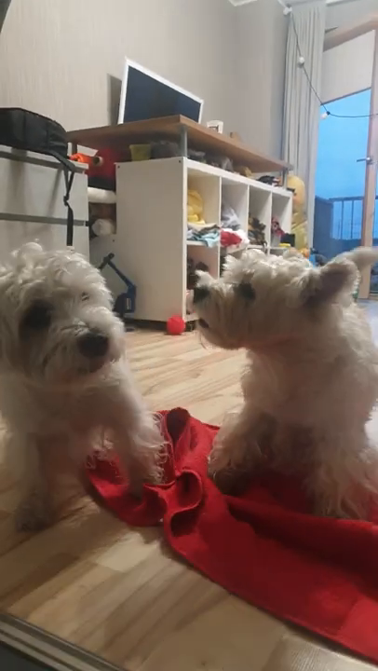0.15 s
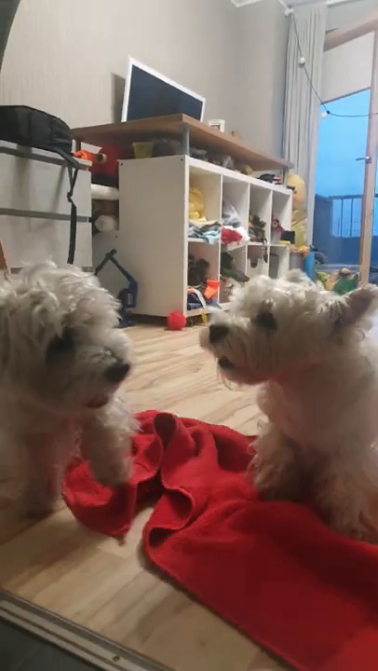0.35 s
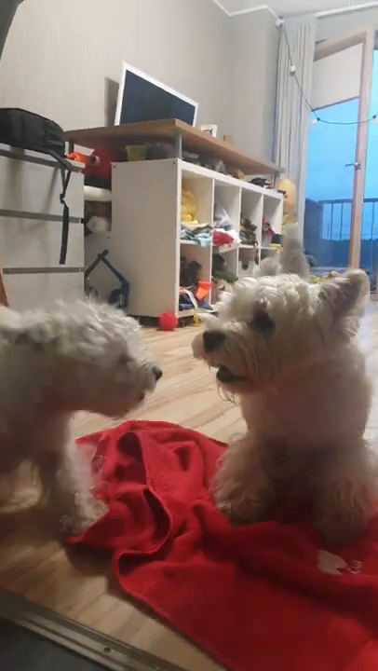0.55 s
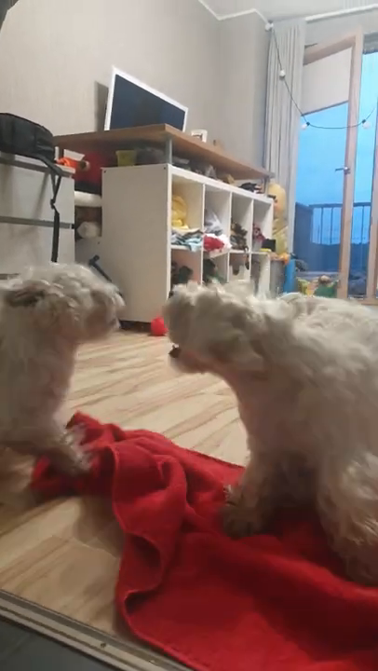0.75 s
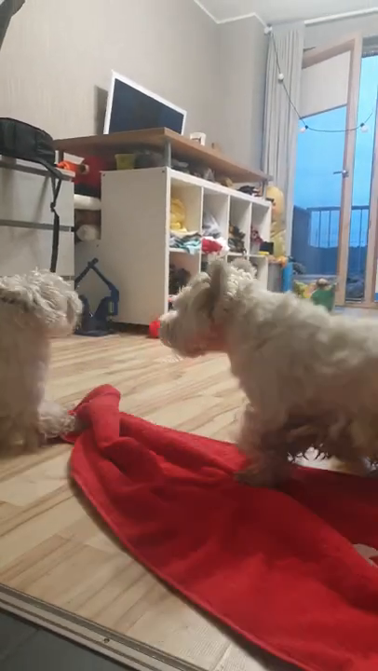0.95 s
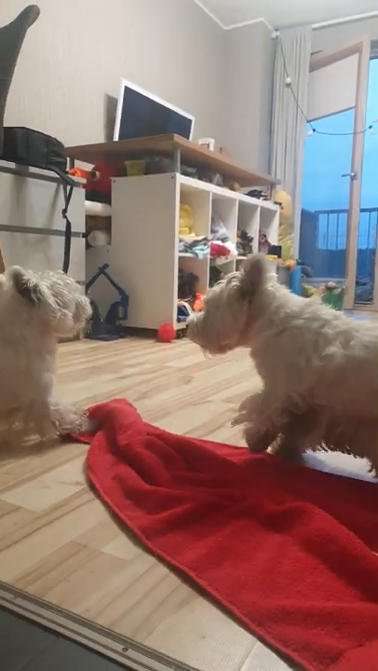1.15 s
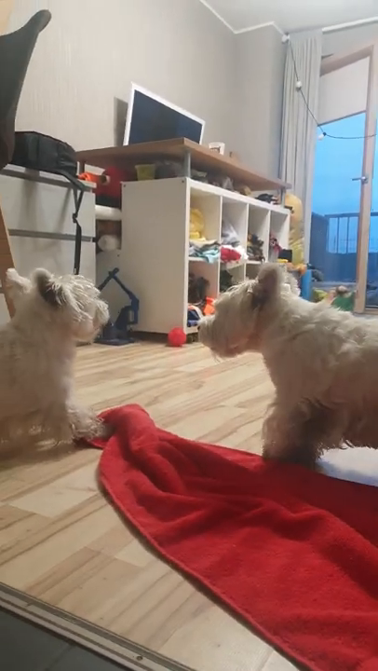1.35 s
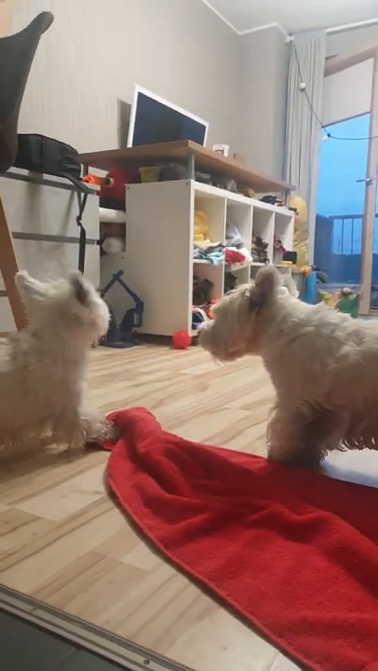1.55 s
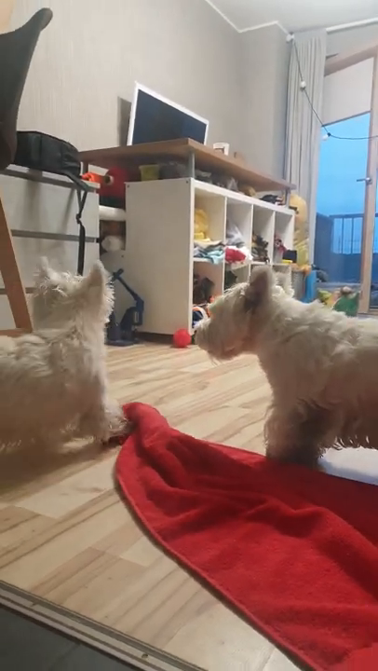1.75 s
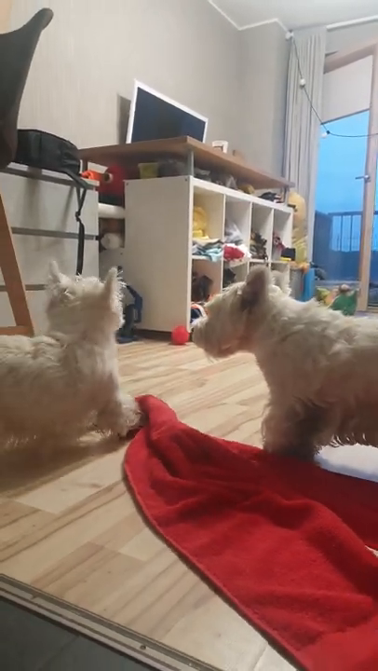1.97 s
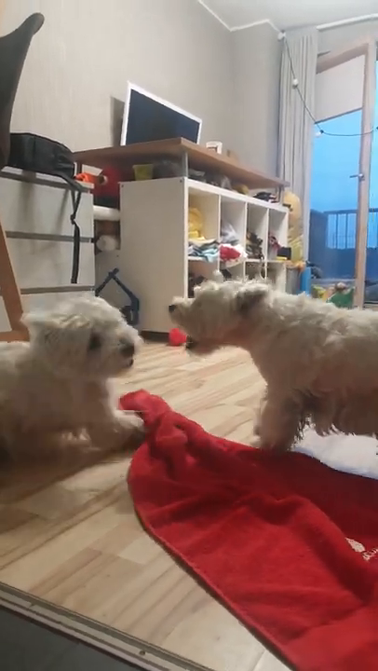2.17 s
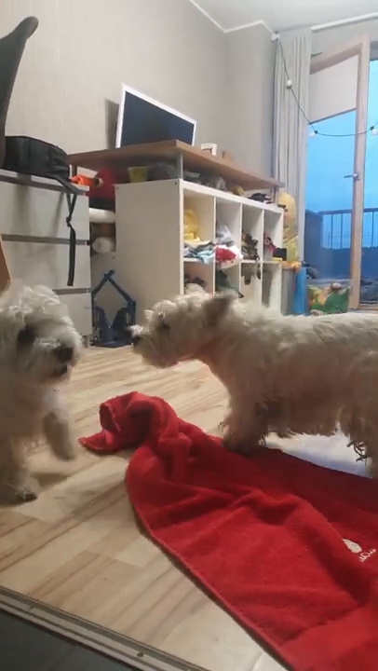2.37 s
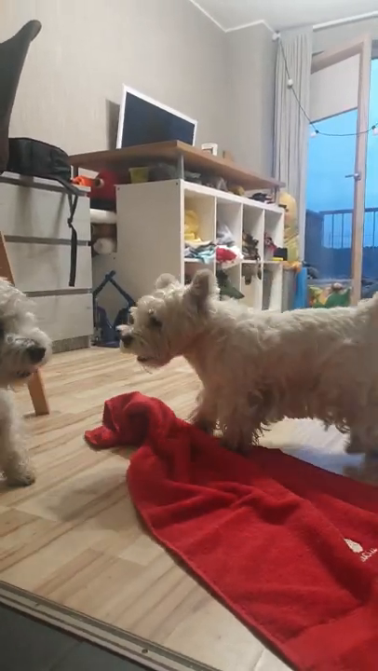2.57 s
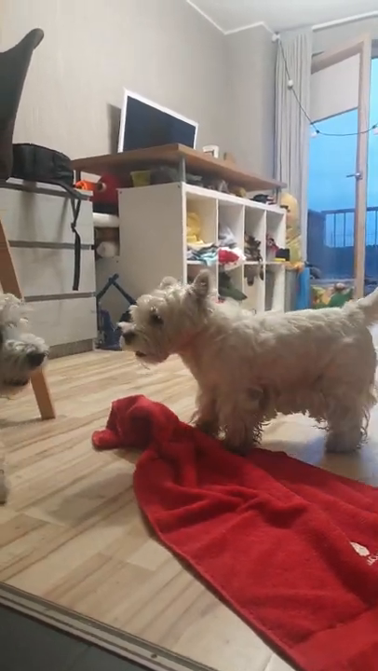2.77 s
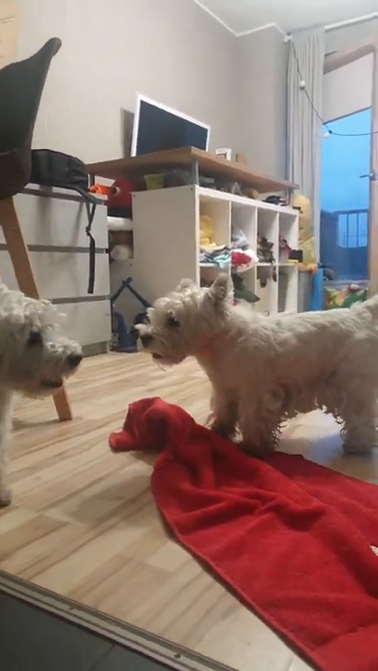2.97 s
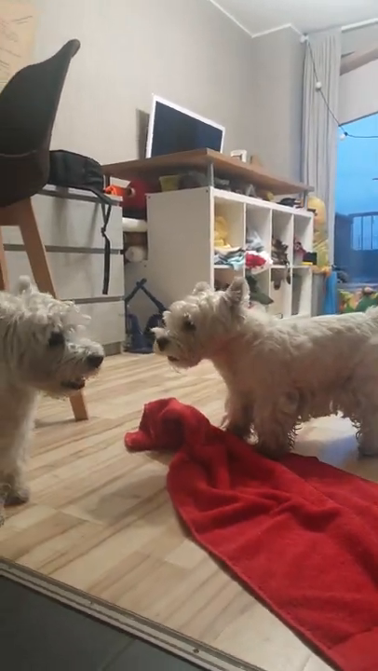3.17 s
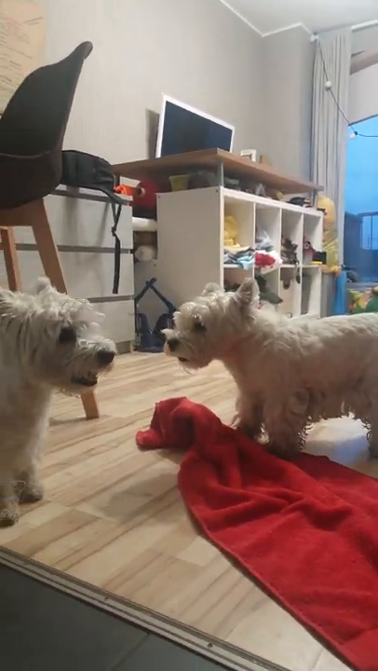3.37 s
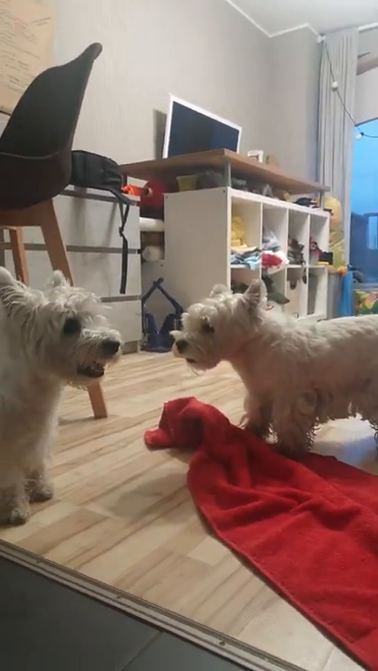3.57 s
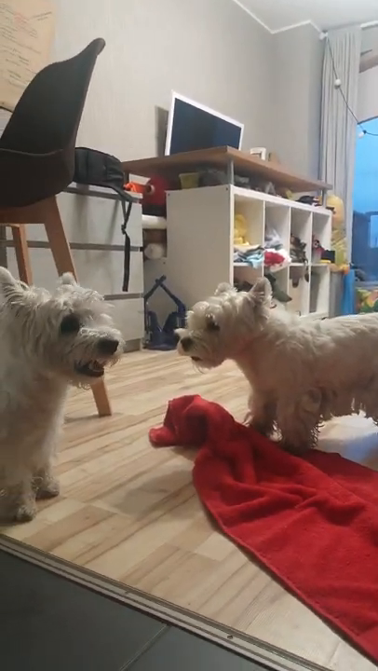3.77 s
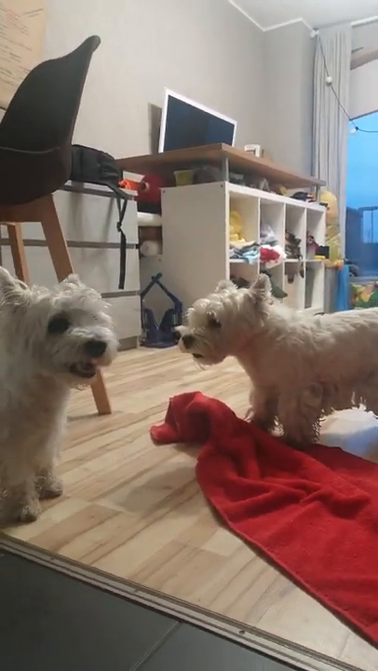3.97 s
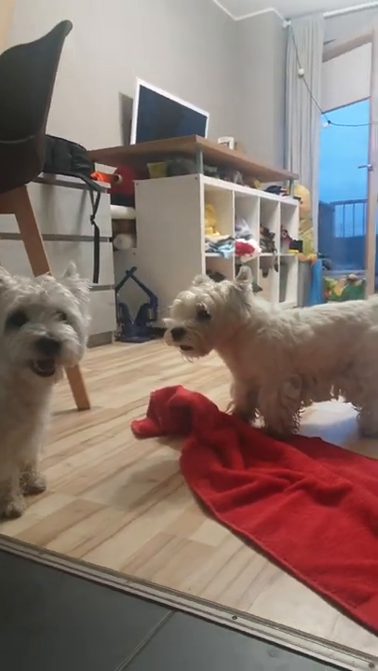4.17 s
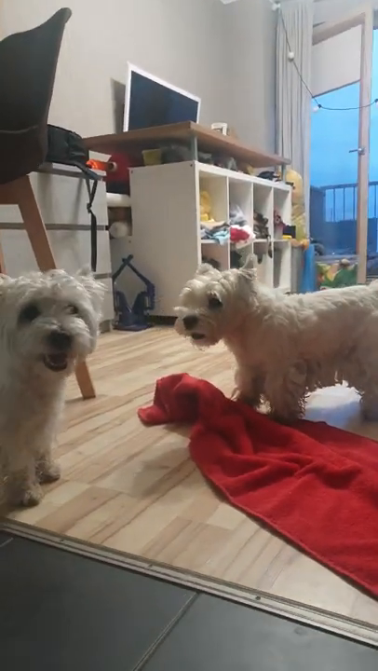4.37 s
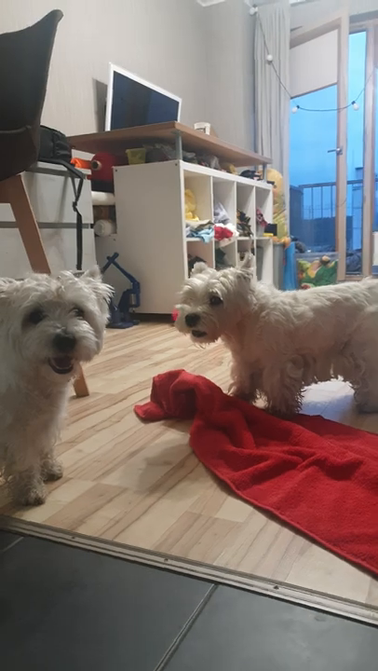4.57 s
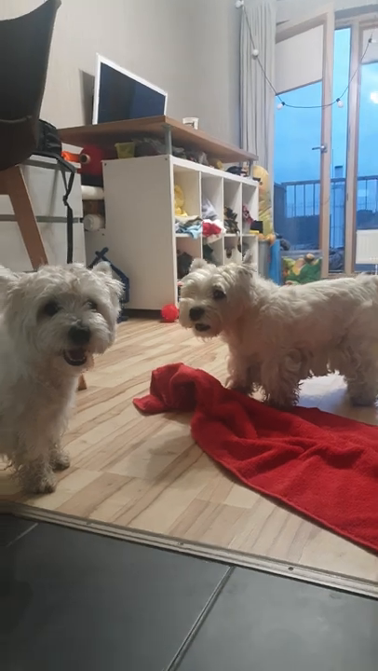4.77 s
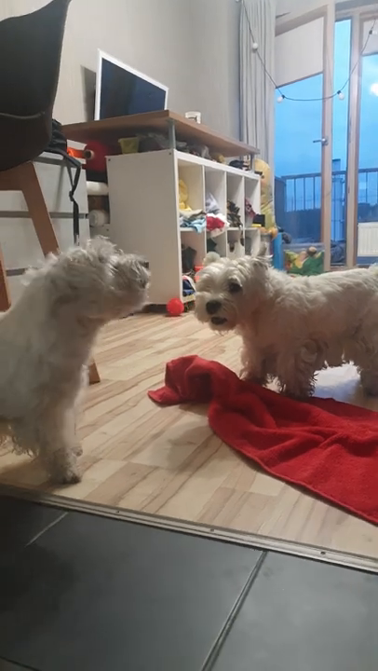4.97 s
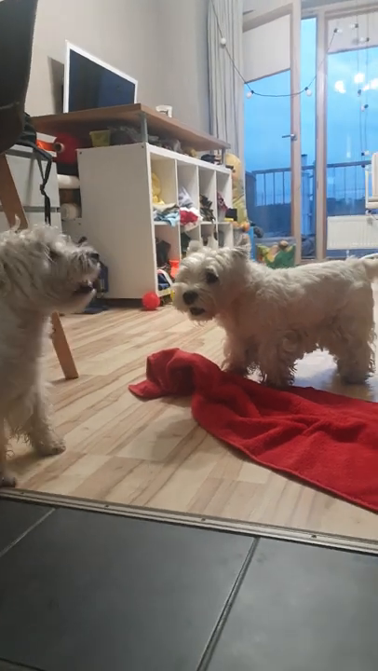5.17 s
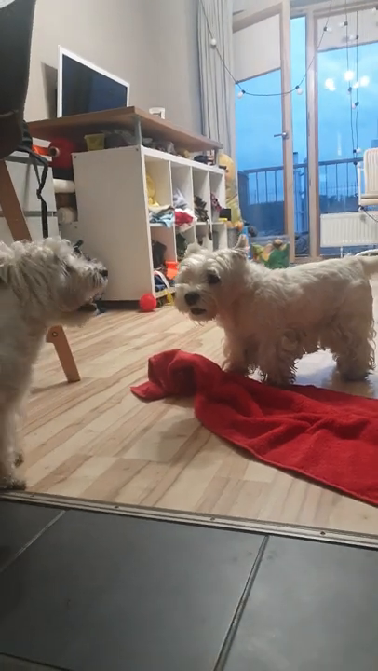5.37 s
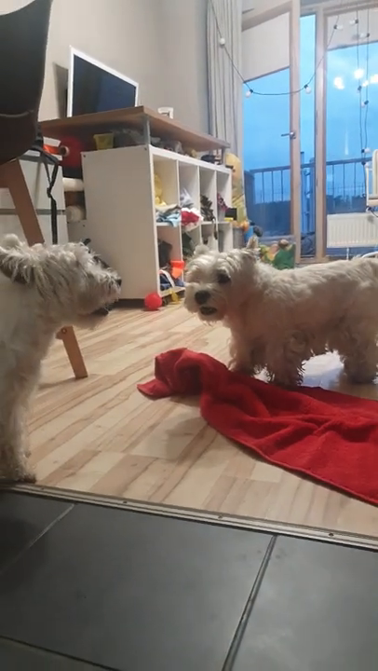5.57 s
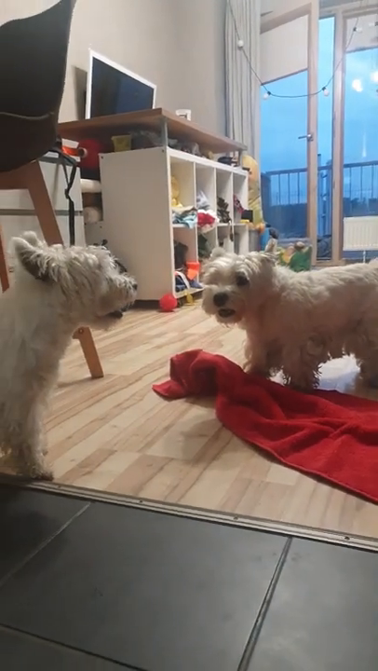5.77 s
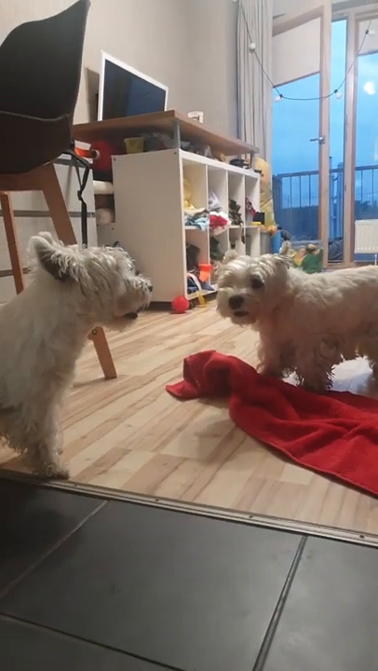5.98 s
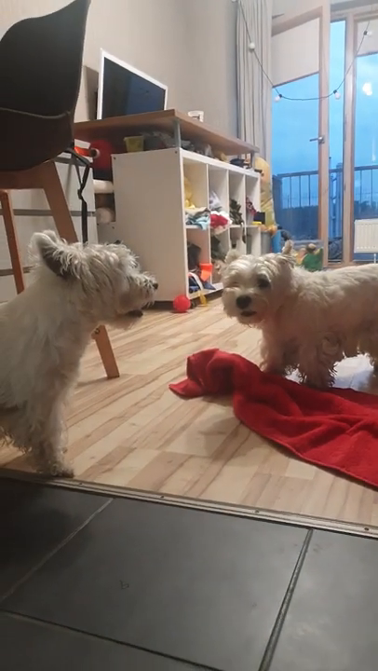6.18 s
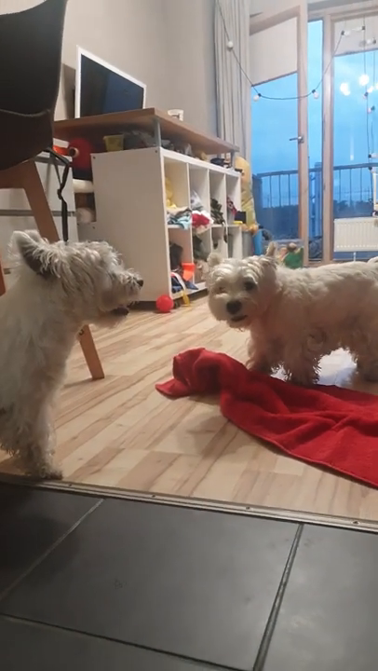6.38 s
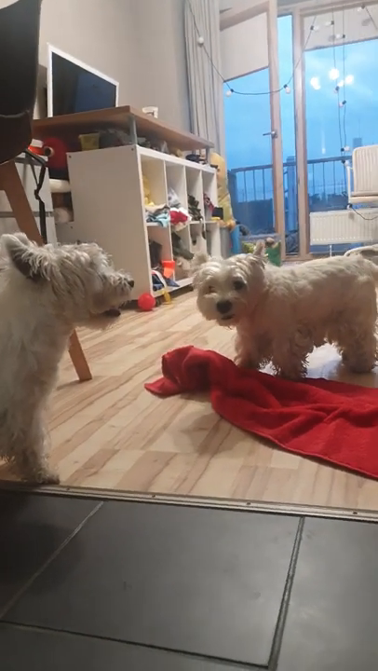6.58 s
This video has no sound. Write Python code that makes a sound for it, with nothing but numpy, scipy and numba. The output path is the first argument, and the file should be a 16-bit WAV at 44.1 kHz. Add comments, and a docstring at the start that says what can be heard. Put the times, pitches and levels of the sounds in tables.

```python
"""Two loud, hoarse barks ring through a living room, among low grumbles, claw taps, thumps and sharp snorts.
Two small terriers face each other on a wooden floor, about a metre from a two-port microphone.
Barks, grumbles and a low chest tone are vocal fold pulses and turbulence, coloured by resonance or spectrum;
snorts are shaped noise, claws are ticks and skidding noise, thumps are dying sines.
Sparse room noise lies below: rumble, hum, air and hiss; its low part swells towards the end."""
import sys
import numpy as np
from scipy import signal
from scipy.fft import rfft, irfft, next_fast_len
from scipy.io import wavfile
from scipy.ndimage import uniform_filter1d, minimum_filter1d
from numba import njit

SR = 44100
rng = np.random.default_rng(int(sys.argv[2]) if len(sys.argv) > 2 else 0)


def unload_audio(sound):
    """Save the sound as a 16-bit wav file, at the path given as the first command line argument."""
    columns = np.transpose(np.atleast_2d(sound))
    # keep every value between -1 and 1, then stretch to whole-number steps
    steps = np.round(np.clip(columns, -1, 1) * 32767)
    wavfile.write(sys.argv[1], SR, steps.astype(np.int16))


N = 292277
TIME = np.arange(N) / SR

# Barks, one push of effort each: (full effort at [s], attack [s], hold [s], release [s], level [dB],
# top pitch [Hz], pitch breaks after [s], lower note [Hz], roughness [0-1],
# clear overtone on the top note [dB], on the lower note [dB])
BARK_EFFORTS = [(.823, .03, .026, .045, -13, 763.7, .047, 582.8, 0.34, -5, -2.5),
                (2.251, 0.028, .039, 0.028, -11.8, 656.4, .034, 534, 0.67, -18, 1)]
# Throat and mouth resonances with the jaws wide open: (centre [Hz], width [Hz], level [dB])
FIRST_THROAT = [(735, 220, -16), (1208, 130, 3), (1520, 470, -1.5), (2200, 270, 1.5), (2620, 119, 2),
                (3070, 320, -7), (4040, 290, -14)]
SECOND_THROAT = [(805, 210, -8), (1090, 216, 6), (1206, 396, 3.5), (1594, 100, 0.5), (1908, 161, 1),
                 (2600, 730, -4.5), (2794, 160, 1), (3610, 150, -5.5)]
ATTACK_CURVE = 1.6   # exponent; below 2 the effort creeps in before it surges
REST_PITCH_HZ, PITCH_LAW = 195.15, .85   # pitch climbs from rest as a power of the effort
BREAK_S, SAG_HZ_PER_S = 0.0079, 350   # the drop to the lower note takes this long; then that note sags
JAW_AT_REST, JAW_LAW = 0.29, 1   # mouth opening 0-1 without effort; it grows as a power of the effort
LOW_NOTE_ROUGHNESS = .52   # 0-1

# Low grumbles, and the low chest tone as the first bark dies away:
# (start [s], pitch halfway [Hz], level before the fade [dB])
LOW_VOICES = [(0, 191.7, -39), (.325, 168, -55.5), (0.751, 240.4, -41), (.889, 205, -43),
              (1.056, 167.2, -44.5), (1.115, 142, -46), (2.114, 185.2, -47.5), (2.632, 176.7, -52),
              (2.68, 215.8, -52), (4.895, 212.3, -45)]
# Spectrum of these low voices: (frequency [Hz], level [dB])
LOW_VOICE_COLOUR = [(100, -3.5), (200, 3.5), (340, -2), (600, -15), (1100, -6.5), (1800, -18), (4000, -20),
                    (9000, -33.5)]
LOW_VOICE_S = 0.043

# Puffs of air through the muzzle: (peak [s], length [s], level [dB], nasal share of power [0-1],
# throat rasp relative to the puff [dB], mouth resonance [Hz])
SNORT_PUFFS = [(.005, 0.031, -45, 0.06, 1.5, 1180), (0.392, 0.098, -53, .2, -9.5, 2044),
               (0.521, 0.043, -54.5, 0.92, -24, 2230), (2.73, .105, -58, 0.55, -12.5, 1700),
               (4.899, .06, -53, 0.09, -16, 2245), (5.018, 0.062, -41.5, 1, -25.5, 2100),
               (5.146, 0.12, -43, 0.28, -9, 2100), (5.455, 0.055, -42.5, 1, -17.5, 2100),
               (5.536, .075, -42, 0, -29, 2350), (6.332, .05, -35.5, .15, -2, 2640)]
# Air in the mouth: (multiple of the mouth resonance [ratio], level [dB])
MOUTH_AIR = [(0.049, -24), (.2, -17.5), (0.429, -21), (.66, -6), (.88, 6), (1.15, -3), (1.451, -5.5),
             (2, -13.5), (3.299, -28.5), (7, -40.5)]
# Air in the nostrils, also used for hiss past the teeth: (frequency [Hz], level [dB])
NOSE_AIR = [(100, -12.5), (450, -3.5), (1200, -10.5), (2000, -9.5), (3200, -2), (5000, 3), (6800, -2.5),
            (8500, -12.5), (12000, -7), (16000, -14.5)]
# Air rasping in the throat: (frequency [Hz], level [dB])
THROAT_RASP = [(100, -15.5), (220, 0.5), (450, 4), (680, 4), (880, -5.5), (1150, 3), (1500, -10),
               (2100, -10.5), (2800, -7), (3700, -19.5), (9000, -36.5)]
SNORT_RISE_SHARE = .35   # of its length

# Claws on the boards: (time [s], level before gain and colour [dB],
# top octave against the mids [dB], starting skid level before gain and colour [dB])
CLAW_TAPS = [(0.1193, -38, 1, -2), (.363, -43, -27, 0), (0.5778, -43, 7, 0), (0.5879, -28, 2, -2.5),
             (.7172, -36, -17, -8), (1.0251, -36.5, -19.5, -35), (2.0987, -29.5, -10.5, -13),
             (2.3288, -37.5, 6, -0.5), (2.409, -36.5, 0, -10), (2.4778, -35.5, -21, -3),
             (2.524, -41.5, -6, -7), (2.8993, -42.5, -18.5, -7), (3.5024, -62.5, 6, -5.5),
             (4.882, -57, -19, -1), (4.916, -41.5, -23, -18), (5.0007, -34, -7, 5.5), (5.007, -30, -10, -7),
             (5.1535, -36, 9.5, -9), (5.4314, -37.5, -4, -3.5), (6.314, -36.5, -8, -12)]
# Spectrum of claw on wood: (frequency [Hz], level [dB])
CLAW_ON_WOOD = [(150, -17.5), (350, -7), (650, -4), (1000, -10), (2000, -7.5), (3500, -4), (5000, 2.5),
                (6800, -2), (8500, -12.5), (11500, -3.5), (16000, -12.5)]
TICKS_IN_ROOM_DB = 4   # the boards throw the ticks up into the room

# Soft thumps of paws and jaws: (time [s], level before the band filter [dB], pitch [Hz])
PADDED_BLOWS = [(.577, -29.5, 337), (.592, -30, 534), (.692, -37.5, 232), (2.099, -32.5, 296),
                (2.331, -26, 270), (2.412, -34, 333), (2.487, -37.5, 335), (5.001, -35.5, 640),
                (5.007, -31.5, 292), (5.169, -22.5, 204), (6.354, -16.5, 258)]
THUMP_T60_S = 0.03066

# Spectrum of the room noise: (frequency [Hz], level [dB])
ROOM_TONE = [(18, -42), (35, -25.5), (64, -0.5), (115, -3.5), (161, -3), (210, -18.5), (280, -10),
             (404, -26.5), (988, -21.5), (1280, -25.5), (2350, -33.5), (5590, -37.5), (7090, -42.5),
             (8600, -55.5), (16000, -54)]
# Hum of a household appliance: (mean frequency [Hz], level on the rumble's scale [dB])
APPLIANCE_HUM = [(68, -4.5), (106, -9), (147, -12.5), (212, -12.5), (282, -13)]
# Treble hiss: (time [s], level [dB])
HISS_LEVEL = [(0, -65.5), (1.4, -100), (3.42, -93), (3.55, -75.5), (4.25, -80.5), (5.7, -69.5)]
RUMBLE_DB, MIDDLE_DB = -62, -68   # base levels before the swell and the lift
SWELL_AT_S, SWELL_S = 4.98, 0.24   # middle and time constant of the one smooth swell
RUMBLE_SWELL_DB, MIDDLE_SWELL_DB = 11.5, 12
FLOOR_FOLLOWS_HISS = 0.13   # share of the hiss's dB swing that the lower noise takes part in

# Reverberation time of the room: (frequency [Hz], T60 [s])
REVERB_TIME = [(100, 0.75), (250, 0.22), (600, 0.38), (1100, 0.42), (2500, 0.4), (5000, .42), (9000, 0.3),
               (16000, 0.2)]
# Likeness of diffuse sound at the two ports: (frequency [Hz], left-right correlation [-1 to 1])
PORT_LIKENESS = [(60, 1), (250, 0.99), (500, 0.62), (1000, 0.21), (3000, 0), (16000, 0.45)]
# Colour difference of the microphone ports, before energy is evened: (frequency [Hz], left minus right [dB])
PORT_COLOURS = [(60, 0.54), (130, -1), (300, -2.5), (700, -1), (1100, -2.5), (1600, -1), (2100, -5.5),
                (2850, -6), (3500, -1), (6000, -1), (8000, -7), (15000, 3.5)]
CUTOFF_HZ = 15950


def bark(row, throat, jitter, doubling, chest_db, hiss_db, edge_hz, shut_hz, jaw_shift, low_hz):
    """Pulses and pulsed turbulence ring in the throat; the opening jaws raise and brighten its resonances."""
    out, age = np.zeros(N), TIME[:SR // 3] - TIME[SR // 8]
    pitch, level_db, rough, mouth, clear_db = bark_gesture(age, *row[1:])
    rough, mouth = np.clip(rough, 0, 1), np.clip(mouth, 0, 1)
    pulses, phase = folds(pitch, jitter * rough, doubling)
    air = rms_one(rng.standard_normal(len(age)) * (1 + np.cos(phase)))
    flutter = from_db(2.2 * drift(160, size=len(age)))
    source = (1 - rough) * pulses + 2.9 * rough * air * flutter

    shift = 1 - jaw_shift * (1 - mouth)
    voice = 0
    for k, (hz, width, db) in enumerate(throat):
        # neighbouring resonances have opposite signs
        voice = voice + (-1) ** k * from_db(db) * resonance(source, hz * shift, float(width))
    voice = cut(voice, edge_hz, "low", order=8)
    voice = cut(voice, low_hz, "high", order=5)
    # half-shut jaws muffle the voice and leave the chest tone
    voice = mouth * voice + (1 - mouth) * cut(voice, shut_hz, "low")
    voice += from_db(chest_db) * (1 - mouth) ** 2 * cut(source, [190, 520], "band")
    # even out the loudness, so that the effort alone sets the level
    voice /= np.sqrt(np.abs(uniform_filter1d(voice ** 2, size=500)) + 1e-12)
    # the second harmonic sings out of the rasp
    voice += from_db(clear_db) * np.sqrt(2) * np.sin(2 * phase)
    # air hisses past the teeth, growing more slowly than the voice
    hiss = from_db(hiss_db + 0.61 * level_db) * cut(colour(air, NOSE_AIR), 3500, "high")
    add(out, voice * from_db(level_db) + hiss, row[0] + age[0])
    return out


def bark_gesture(age, attack, hold, release, peak_db, top_hz, break_after, low_note_hz, roughness,
                 top_clear_db, low_clear_db):
    """Level, pitch and jaws follow the effort; then the voice breaks to a lower, sagging note."""
    rise = (np.maximum(-age, 0) / attack) ** ATTACK_CURVE
    fall = (np.maximum(age - hold, 0) / release) ** 2
    effort = np.exp(-rise - fall) + 1e-9
    effort_db = 20 * np.log10(effort)
    broken = np.clip((age - break_after) / BREAK_S + .5, 0, 1)
    climbing = REST_PITCH_HZ + (top_hz - REST_PITCH_HZ) * effort ** PITCH_LAW
    sagging = low_note_hz - SAG_HZ_PER_S * (age - break_after)
    pitch = (1 - broken) * climbing + broken * sagging
    rough = (1 - broken) * roughness + broken * LOW_NOTE_ROUGHNESS
    mouth = JAW_AT_REST + (1 - JAW_AT_REST) * effort ** JAW_LAW
    clear_db = (1 - broken) * (top_clear_db + .5 * effort_db) + broken * low_clear_db
    return pitch, peak_db + effort_db, rough, mouth, clear_db


def folds(pitch, jitter, doubling, count=12):
    """Vocal fold pulses with an unsteady period; strong and weak pulses alternate. Also gives their phase."""
    unsteady = pitch * (1 + jitter * drift(220, size=len(pitch)))
    phase = 2 * np.pi * np.cumsum(unsteady) / SR
    pulses = sum(np.cos(k * phase) / np.sqrt(k) for k in range(1, count + 1))
    return rms_one(pulses * (1 + doubling * np.cos(phase / 2))), phase


@njit
def resonance(x, hz, width_hz):
    """Two-pole resonance with a moving centre, gain about 1 on top."""
    r, y = np.exp(-np.pi * width_hz / SR), np.zeros(len(x))
    for i in range(2, len(x)):
        drive = (1 - r * r) / 2 * (x[i] - x[i - 2])
        y[i] = drive + 2 * r * np.cos(2 * np.pi * hz[i] / SR) * y[i - 1] - r * r * y[i - 2]
    return y


def low_voices():
    """Grumbles and the first bark's chest tone: short fold pulses and pulsed breath, sagging in pitch."""
    out, age = np.zeros(N), TIME[:SR // 5]
    progress = np.clip(age / LOW_VOICE_S, 0, 1)
    fade = np.sqrt(np.abs(np.sin(np.pi * progress)))
    for start, hz, db in LOW_VOICES:
        pulses, phase = folds(hz * (1 - 0.4 * (progress - .5)), jitter=0.16, doubling=0.39)
        breath = (1 + np.cos(phase)) * rng.standard_normal(len(age))
        voice = rms_one(colour(pulses + breath, LOW_VOICE_COLOUR))
        add(out, from_db(db) * voice * fade, start)
    return out


def snorts():
    """Fluttering jets of air, shared between the mouth and the narrow nostrils, with some rasp in the throat."""
    out, size = np.zeros(N), SR // 2
    for peak, length, db, nasal, rasp_db, mouth_hz in SNORT_PUFFS:
        rise, fall = length * SNORT_RISE_SHARE, length * (1 - SNORT_RISE_SHARE)
        time, nasal = max(peak - 2 * rise, 0) + TIME[:size], np.clip(nasal, 0, 1)
        puff = np.exp(-((time - peak) / np.where(time < peak, rise, fall)) ** 2)
        flow = from_db(db + 0.53 * drift(120, size=size)) * puff
        mouth = np.array(MOUTH_AIR) * [mouth_hz, 1]
        passages = [(np.sqrt(1 - nasal), mouth), (np.sqrt(nasal), NOSE_AIR), (from_db(rasp_db), THROAT_RASP)]
        jets = sum(gain * colour(rng.standard_normal(size), spectrum) for gain, spectrum in passages)
        add(out, flow * jets, time[0])
    return out


def claws(gain_db, skid_t60):
    """Each tap is one sharp tick with its own brightness; then the claw skids over the grain for a moment."""
    ticks, skids = np.zeros((2, N))
    age = TIME[:SR // 10]
    tick = from_db(gain_db) * (age == 0)
    for s, db, top_db, skid_db in CLAW_TAPS:
        skid_level_db = skid_db - 60 * age / skid_t60 + 2.0 * drift(400, size=len(age))
        skid = rng.standard_normal(len(age)) * from_db(skid_level_db)
        for track, touch in (ticks, tick), (skids, skid):
            top = cut(touch, 8100, "high", order=1)
            add(track, from_db(db) * (touch + (from_db(top_db) - 1) * top), s)
    return colour(ticks, CLAW_ON_WOOD), colour(skids, CLAW_ON_WOOD)


def thumps():
    """A padded blow rings for only a few low cycles."""
    out, age = np.zeros(N), TIME[:SR // 5]
    for s, db, hz in PADDED_BLOWS:
        add(out, from_db(db - 60 * age / THUMP_T60_S) * np.sin(2 * np.pi * hz * age), s)
    return cut(out, [110, 1100], "band")


def room(x, gap_s, build_s):
    """Dense reflections build up quickly, then die band by band."""
    age = TIME[:SR]
    hz, centres = np.arange(SR // 2 + 1), np.transpose(REVERB_TIME)[0]
    noise, tail = rfft(diffuse(SR)), 0
    # overlapping bands, each 1 at its own centre and 0 at its neighbours'
    for share, (_, t60) in zip(np.eye(len(centres)), REVERB_TIME):
        band = irfft(noise * at_hz(np.c_[centres, share], hz), SR)
        tail = tail + band * from_db(-60 * age / t60)
    tail *= 1 - np.exp(-np.maximum(age - gap_s, 0) / build_s)
    return signal.fftconvolve(x[None], rms_one(tail) / np.sqrt(SR), axes=1)[:, :N]


def background():
    """Rumble with a wavering hum and soft air noise swell together under a thin hiss."""
    swell = .5 + .5 * np.tanh((TIME - SWELL_AT_S) / (2 * SWELL_S))
    hiss_db = np.interp(TIME, *np.transpose(HISS_LEVEL))
    lift_db = FLOOR_FOLLOWS_HISS * (hiss_db - hiss_db.mean())
    rumble_db = RUMBLE_DB + RUMBLE_SWELL_DB * swell + lift_db
    middle_db = MIDDLE_DB + MIDDLE_SWELL_DB * swell + lift_db
    noise = np.array([colour(side, ROOM_TONE) for side in diffuse(next_fast_len(N))[:, :N]])
    hum = 0
    for hz, db in APPLIANCE_HUM:
        phase = 2 * np.pi * np.cumsum(hz + 4 * drift(8)) / SR
        hum = hum + from_db(db) * np.sqrt(2) * np.sin(phase)
    rumble = from_db(rumble_db) * (0.92 * rms_one(cut(noise, 290, "low", order=4)) + hum)
    middle = from_db(middle_db) * rms_one(cut(noise, [380, 2600], "band", order=3))
    hiss = from_db(hiss_db) * rms_one(cut(noise, 2800, "high", order=4))
    return rumble + middle + hiss


def diffuse(size):
    """White stereo noise whose left-right likeness depends on frequency, strongest in the bass."""
    mid, side = rfft(rng.standard_normal((2, size)))
    alike = np.clip(at_hz(PORT_LIKENESS, np.arange(len(mid)) * SR / size), -1, 1)
    spectrum = np.sqrt((1 + alike) / 2) * mid + np.sqrt((1 - alike) / 2) * side * [[1], [-1]]
    return irfft(spectrum, size)


def place(x, left_db, lag_ms):
    """A source reaches the sides at different levels and times; a positive lag delays the left."""
    left = from_db(left_db / 2) * np.interp(TIME - lag_ms / 1000, TIME, x)
    return np.array([left, from_db(-left_db / 2) * x])


def add(track, sound, start):
    """Mix a sound into the track at its start time."""
    at = max(round(start * SR), 0)
    track[at:at + len(sound)] += sound[:N - at]


def from_db(db):
    """Decibels to gain."""
    return 10 ** (np.asarray(db) / 20)


def rms_one(x):
    """Scale to rms 1."""
    return x / np.sqrt(np.mean(x ** 2) + 1e-20)


def at_hz(points, hz):
    """Read a table on a log-frequency axis."""
    f, value = np.transpose(points)
    return np.interp(np.log(np.maximum(hz, 1)), np.log(f), value)


def cut(x, hz, kind, order=2):
    """Butterworth filter."""
    sos = signal.butter(order, np.clip(hz, 10, SR * .49), kind, fs=SR, output="sos")
    return signal.sosfilt(sos, x + 1e-18)


def colour(x, spectrum, size=2048):
    """Causal (minimum-phase) filter with the shape of the given spectrum and unit energy."""
    level_db = at_hz(spectrum, np.arange(size // 2 + 1) * SR / size)
    cepstrum = irfft(level_db * np.log(10) / 20)
    # fold the cepstrum onto positive time
    cepstrum[1:size // 2] *= 2
    cepstrum[size // 2 + 1:] = 0
    response = irfft(np.exp(rfft(cepstrum)))
    return signal.oaconvolve(x, response / np.linalg.norm(response))[:len(x)]


def drift(rate, size=N):
    """Smooth random motion of spread about 1, slower than the given rate [Hz]."""
    return rms_one(cut(rng.standard_normal(size + SR // 2), rate, "low"))[-size:]


def scene():
    """Both dogs are about a metre away; the room answers every sound of theirs but the claw skids."""
    first = bark(BARK_EFFORTS[0], FIRST_THROAT, jitter=0.085, doubling=.35, chest_db=-0.5, hiss_db=-34.0,
                 edge_hz=3980, shut_hz=1700, jaw_shift=0.14, low_hz=640)
    second = bark(BARK_EFFORTS[1], SECOND_THROAT, jitter=0.05865, doubling=0.34, chest_db=0.0, hiss_db=-33.5,
                  edge_hz=3250, shut_hz=1622, jaw_shift=0.02, low_hz=618.6)
    low, air = low_voices() + thumps(), snorts()
    ticks, skids = claws(gain_db=16.0, skid_t60=0.039)

    direct = place(first, left_db=3.0, lag_ms=.1) + place(second, left_db=-5.5, lag_ms=-0.29)
    direct += place(low, left_db=-0.1, lag_ms=0) + place(air, left_db=-1.5, lag_ms=0.058)
    direct += place(ticks + skids, left_db=-1.0, lag_ms=.045)
    into_room = from_db(-2) * first + from_db(-2.0) * second + from_db(-1.5) * low + from_db(-0.5) * air
    into_room += from_db(TICKS_IN_ROOM_DB) * ticks
    reflected = room(into_room, gap_s=0.00033, build_s=0.00034)
    return direct + reflected + background() * from_db([[-.5], [.5]])


def record(dry):
    """Each microphone port adds its colour, a fast limiter holds the loudest peaks and the top is cut."""
    ported = np.array([colour(x, np.array(PORT_COLOURS) * [1, side / 2]) for x, side in zip(dry, (1, -1))])
    allowed = 1 / np.maximum(np.abs(ported).max(axis=0), 1)
    gain = uniform_filter1d(minimum_filter1d(allowed, size=130), size=130)
    top_cut = signal.ellip(10, .1, 80, CUTOFF_HZ, fs=SR, output="sos")
    return signal.sosfilt(top_cut, ported * gain)


dry = scene()
out = record(dry)
unload_audio(out)
```